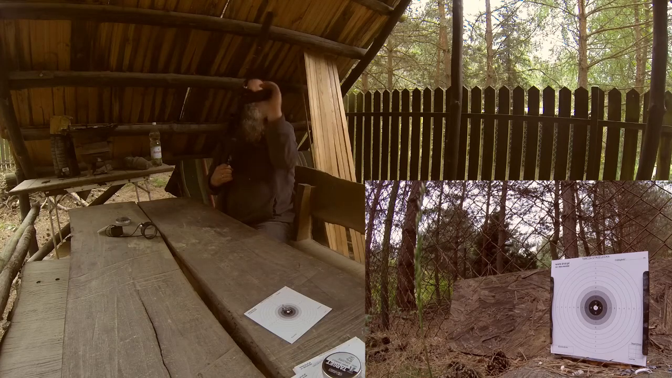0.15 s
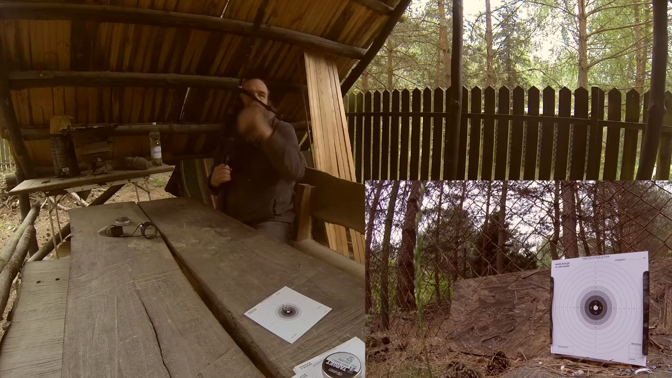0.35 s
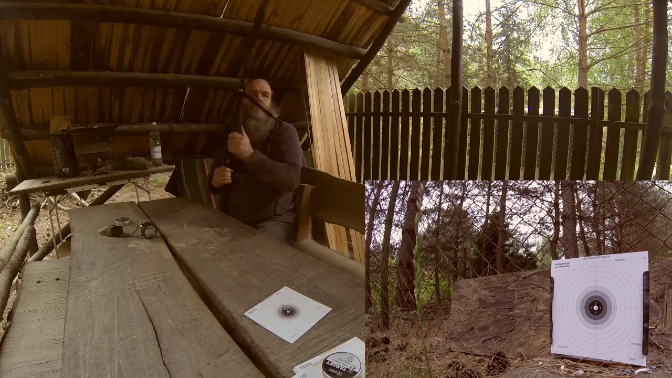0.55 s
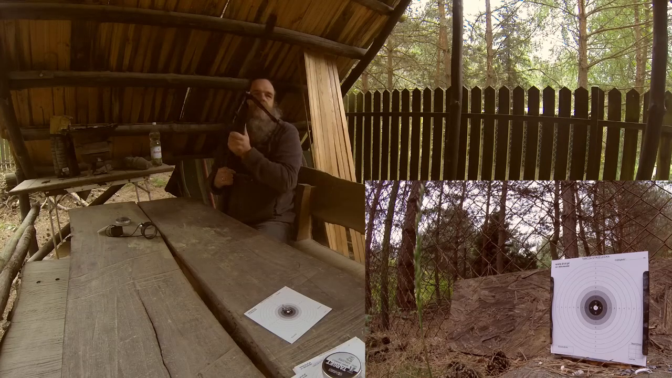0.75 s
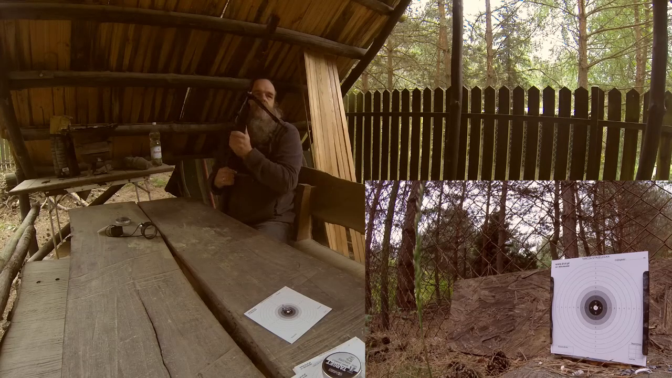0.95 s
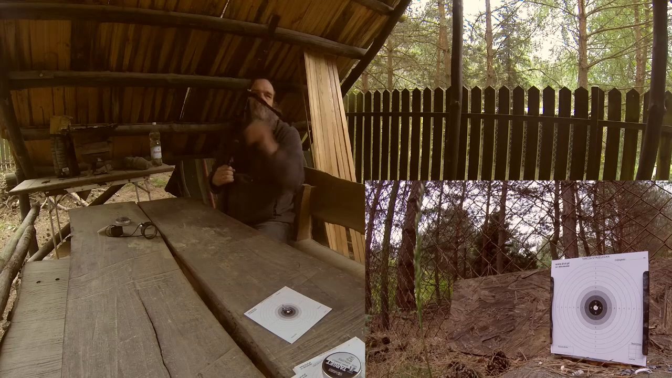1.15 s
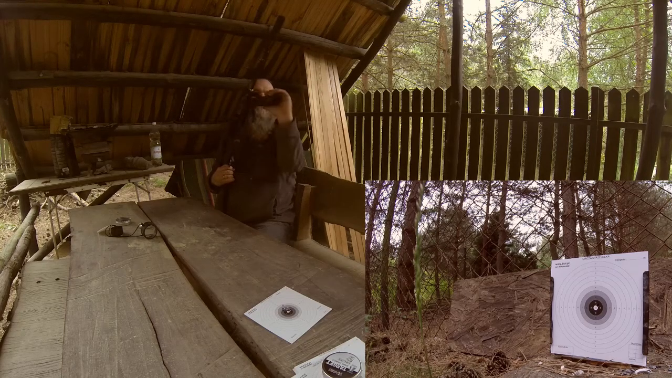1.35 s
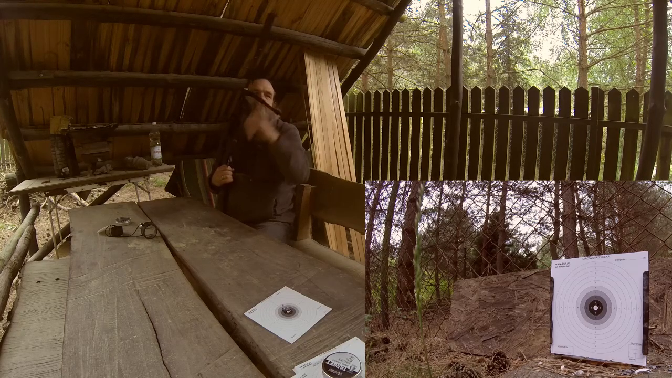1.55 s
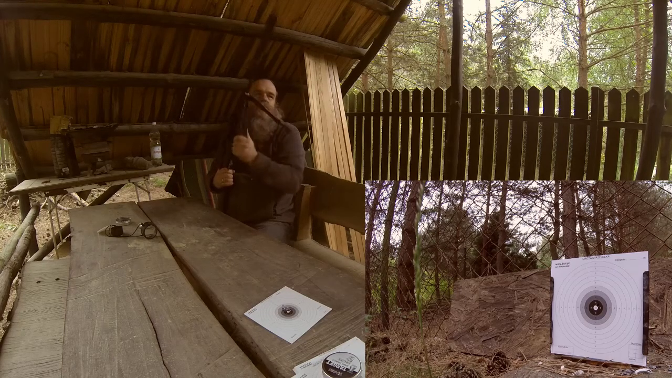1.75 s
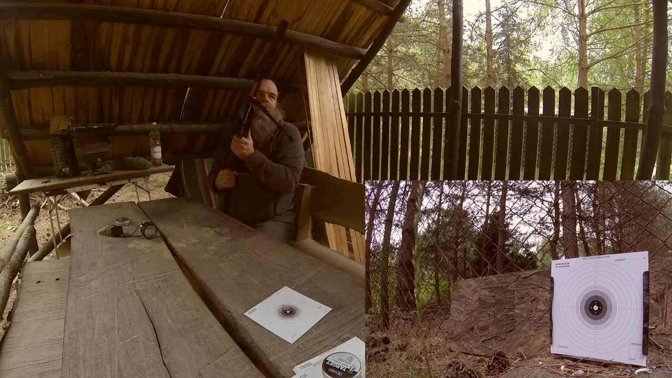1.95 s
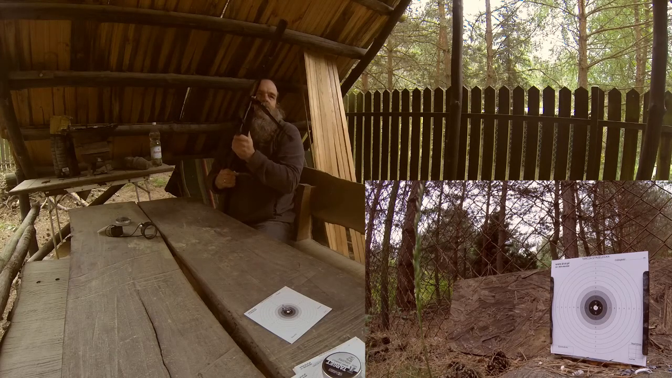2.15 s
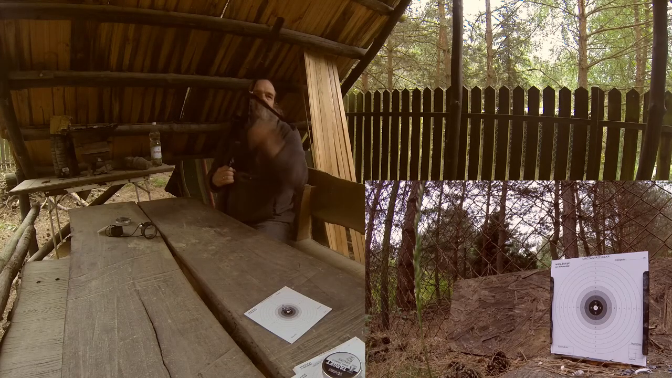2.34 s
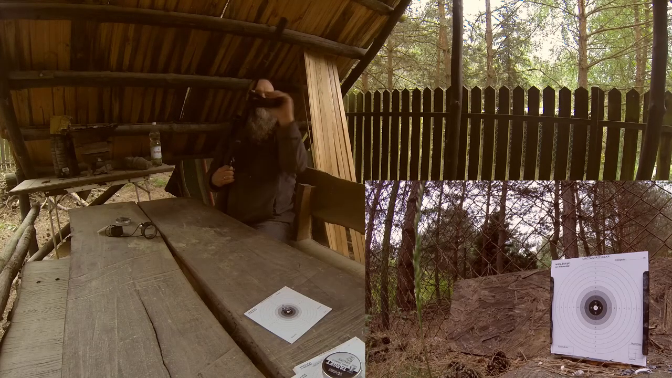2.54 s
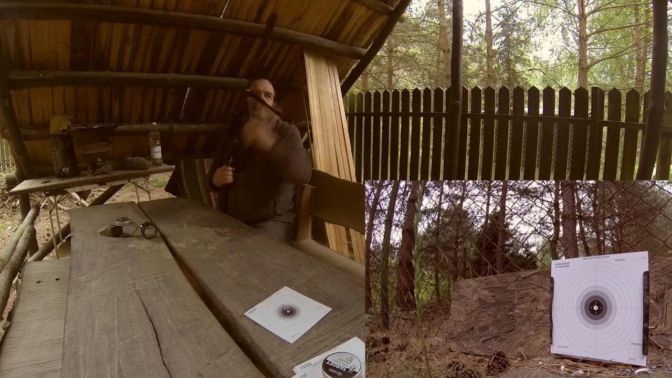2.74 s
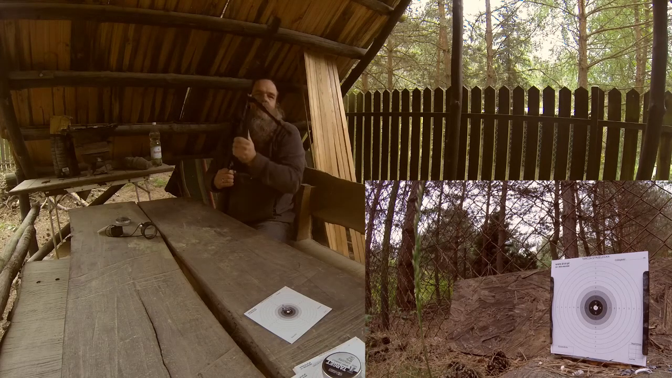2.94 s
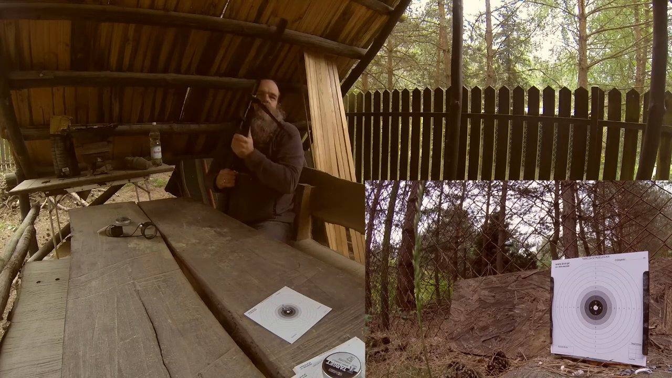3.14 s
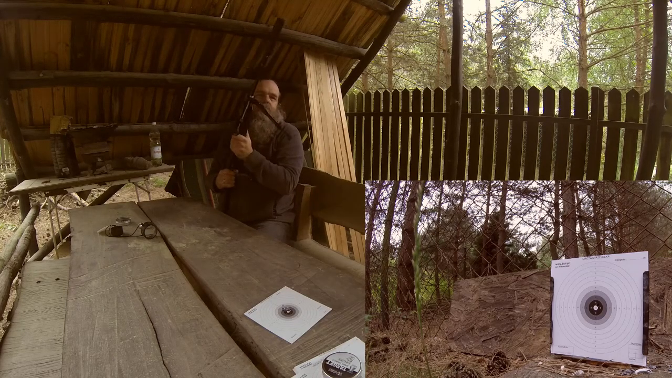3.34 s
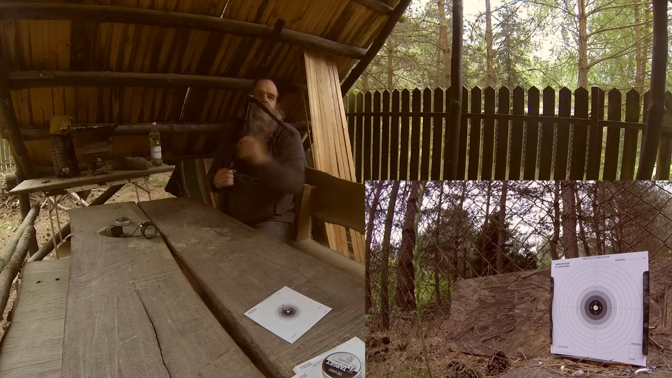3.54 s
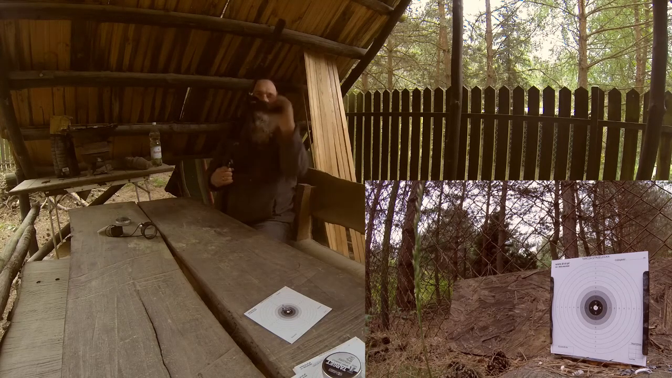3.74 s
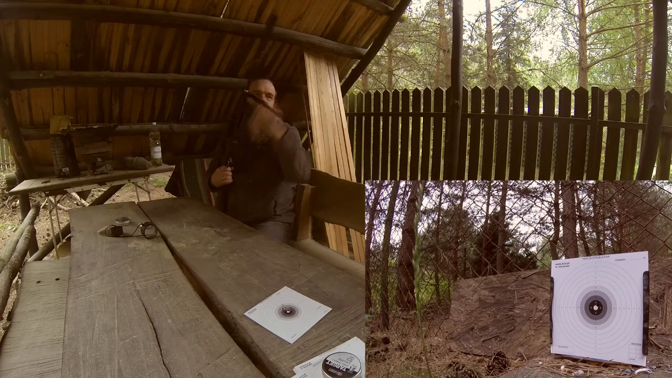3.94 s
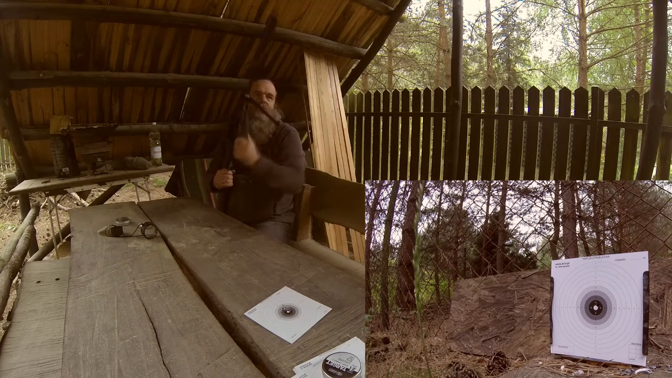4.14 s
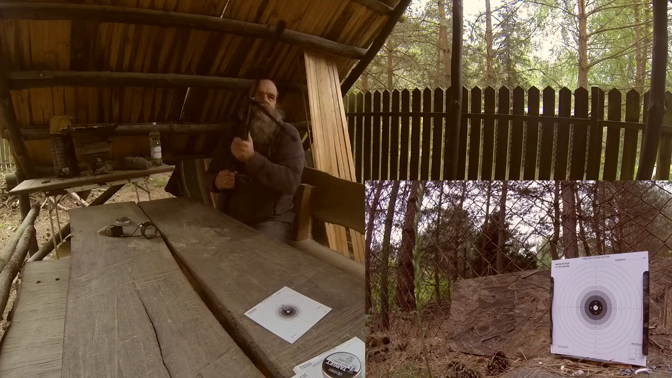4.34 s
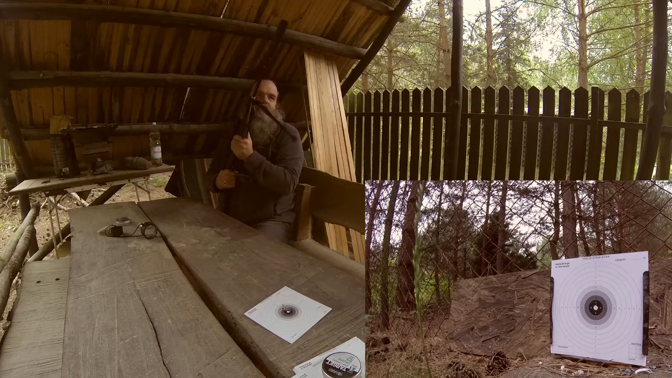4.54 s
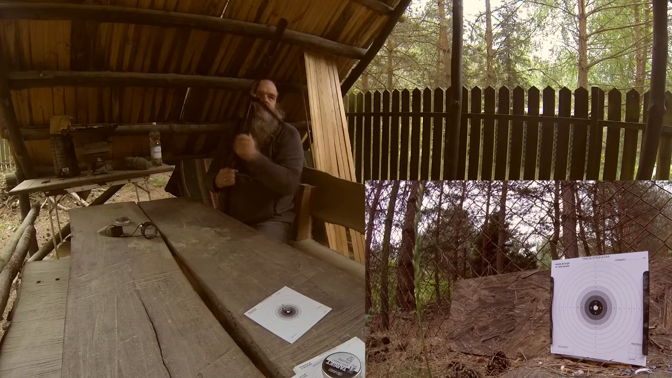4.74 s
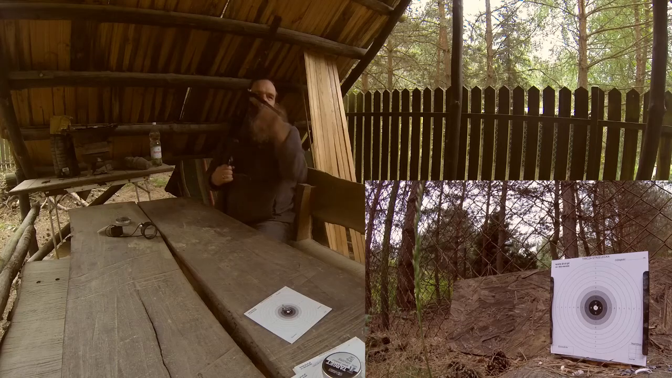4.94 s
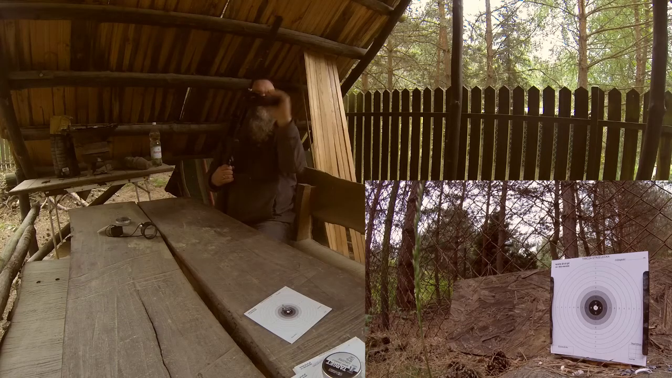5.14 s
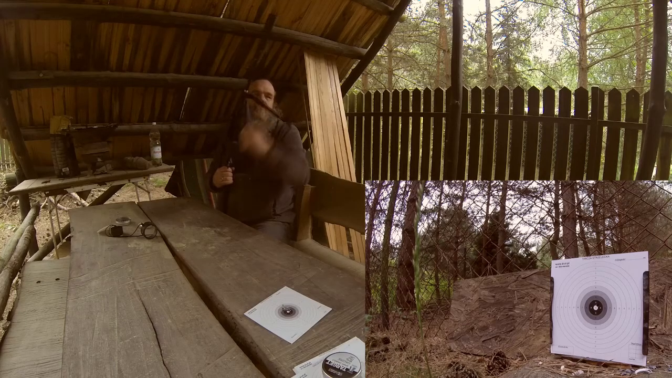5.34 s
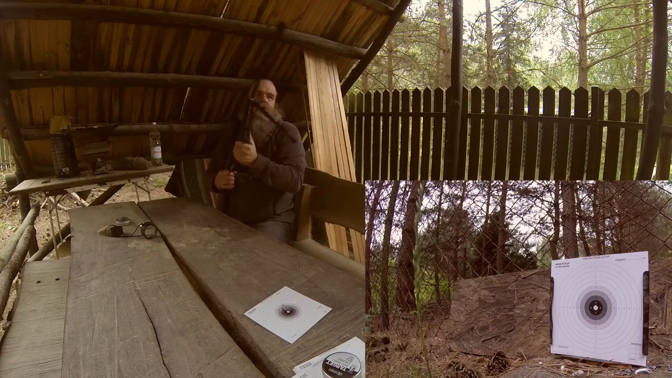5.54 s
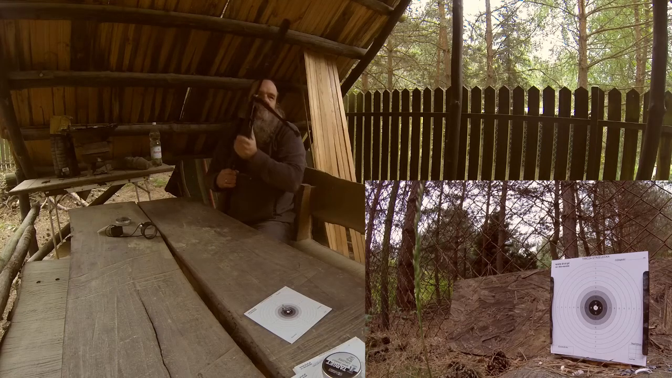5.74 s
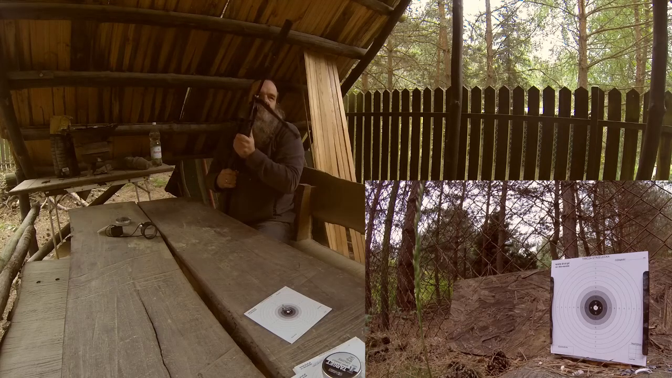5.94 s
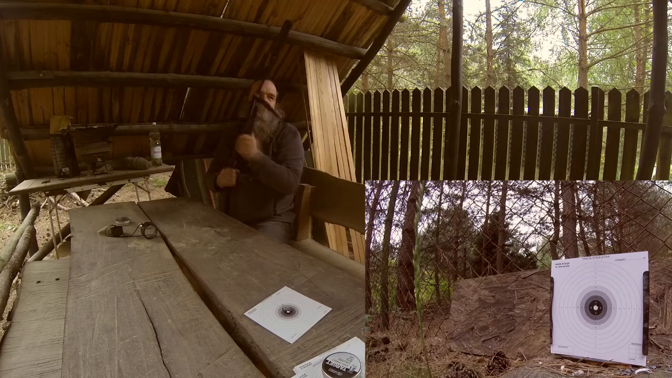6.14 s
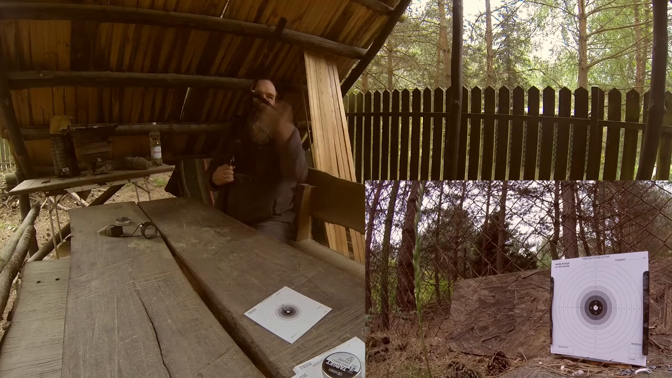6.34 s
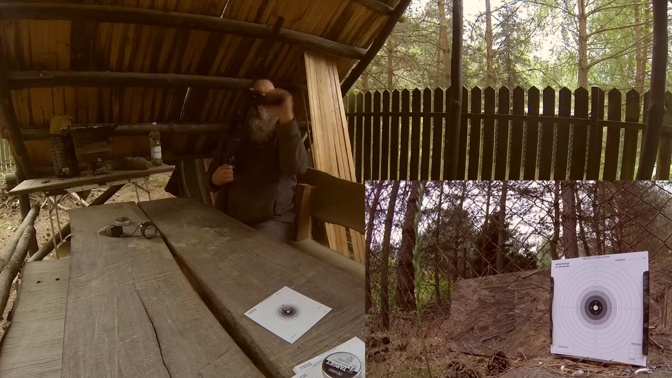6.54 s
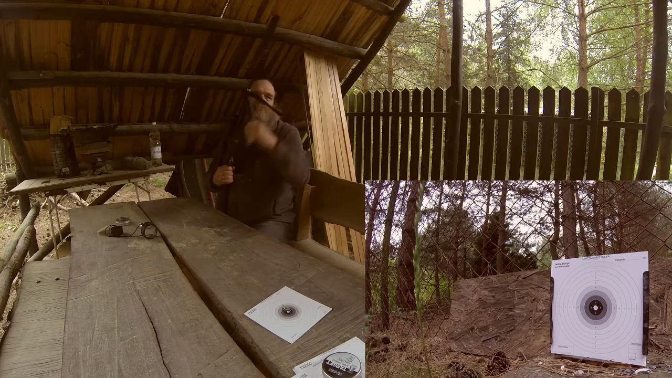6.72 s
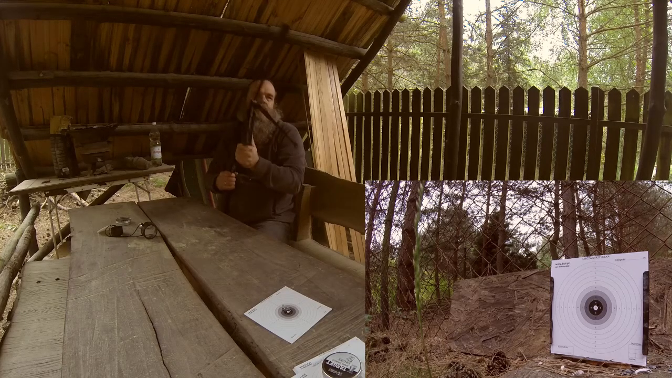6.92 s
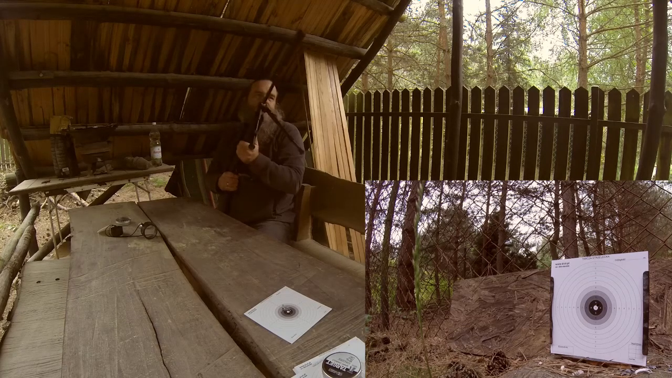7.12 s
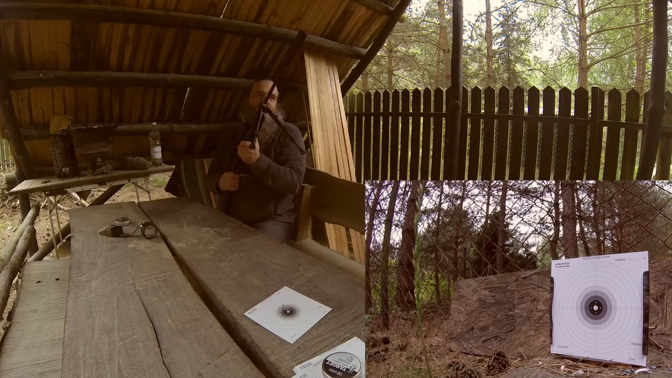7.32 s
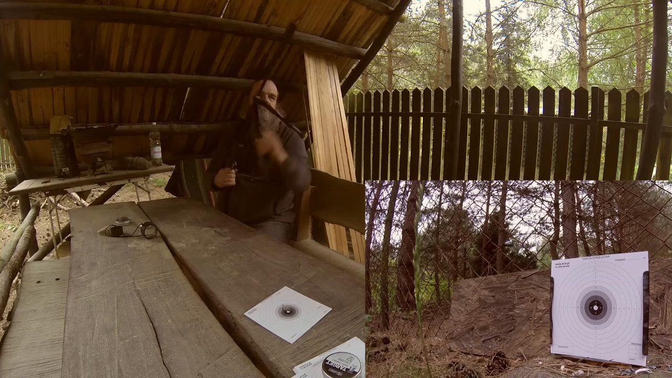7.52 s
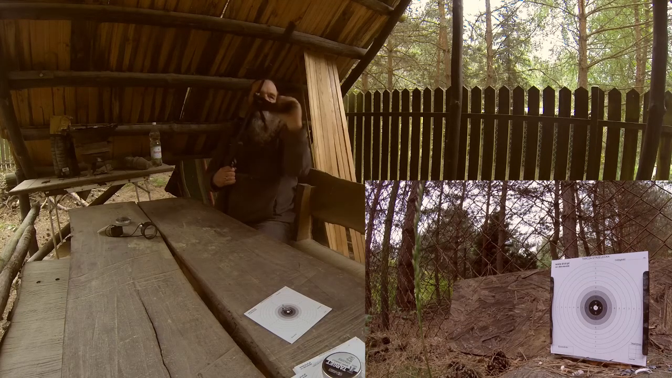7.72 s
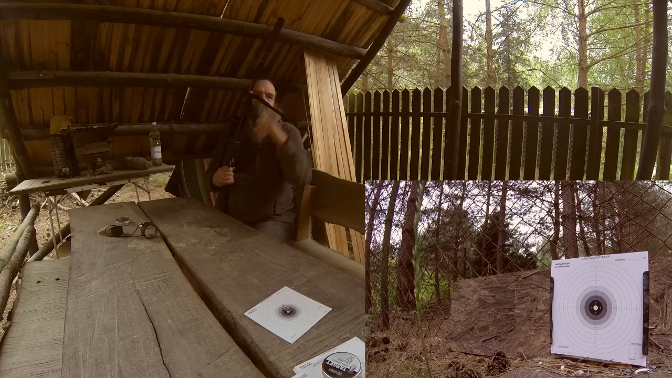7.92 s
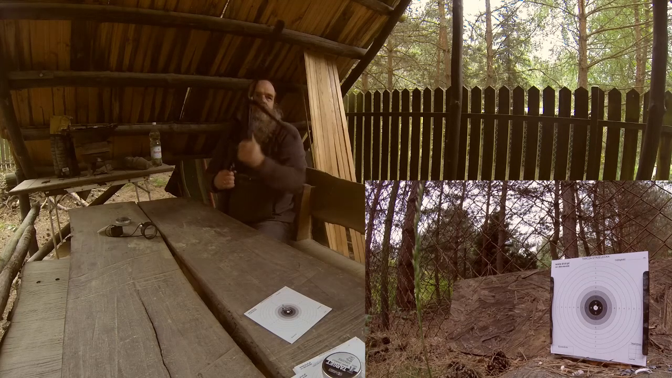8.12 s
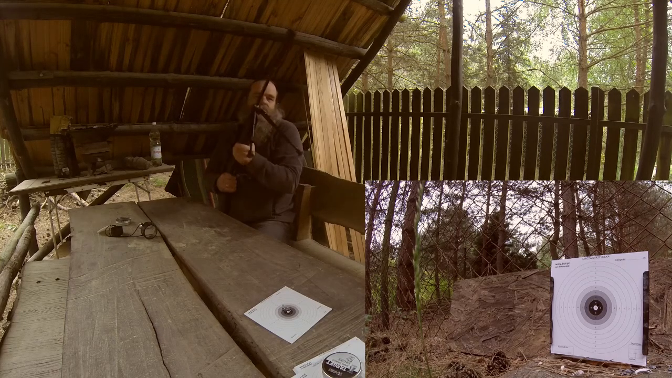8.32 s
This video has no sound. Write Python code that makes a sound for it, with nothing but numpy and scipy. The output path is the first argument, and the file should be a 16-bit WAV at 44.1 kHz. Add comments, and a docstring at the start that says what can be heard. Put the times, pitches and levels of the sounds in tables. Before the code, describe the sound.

The forearm of a pump air rifle slams shut close to the microphone seven times, at about 0.7, 1.9, 3.1, 4.4, 5.8, 7.1 and 8.3 seconds. Each is a sharp, short clack with a little metal chatter; they grow gradually louder and brighter, the last the strongest. Between them come much fainter dry clicks from the linkage: a snap as it opens about 0.4 seconds after each clack, a tick at the end of travel, and a latch click just before the next slam. One such tick comes right at the start. An open wooden shelter adds tight, quickly dying reflections. Underneath runs a very quiet woodland hiss with a low rumble. A barely audible distant engine hums, falling in pitch and fading out by 8 seconds. A small bird gives a few thin, faint, high chirps from 4.2 to 4.6 seconds.

```python
"""Sharp clacks, close by: the forearm of a pump air rifle slams shut, stroke after stroke.
Between slams its linkage clicks through release, opening, end stop, turn back and latch.
One microphone stands near the rifle, under the roof of an open wooden shelter in a wood.
Bench, roof and trees answer each blow; far off lie woodland hiss, an engine and one small bird."""
import sys
import numpy as np
from scipy import signal
from scipy.fft import rfft, irfft
from scipy.io import wavfile

SR = 44100
rng = np.random.default_rng(int(sys.argv[2]) if len(sys.argv) > 2 else 0)


def wrap_up_sound(samples):
    """Save the sound to the file named by the first command line argument, as 16-bit audio."""
    columns = np.atleast_2d(samples).T
    # keep every value between -1 and 1, then stretch to whole-number steps
    tamed = np.clip(columns, -1, 1)
    steps = np.round(tamed * 32767).astype(np.int16)
    wavfile.write(sys.argv[1], SR, steps)


N = 373791

# The forearm slamming shut, near the microphone: t/s, relative level/dB
SLAMS = [(.7399, -13.5), (1.908, -9.5), (3.107, -10), (4.395, -9), (5.806, -8), (7.0828, -7.5),
         (8.3193, -5)]
TREBLE_DB, TREBLE_PER_DB = 3.5, 1.39   # extra treble of a 0 dB slam; harder slams are brighter


def forearm_slams():
    """One hard inward blow, then a short metal chatter as the lever settles."""
    out, t = np.zeros(N), np.arange(18000) / SR
    for start, db in SLAMS:
        treble_db = TREBLE_DB + TREBLE_PER_DB * db
        chatter = from_db(-17) * rng.standard_normal(len(t)) * np.exp(-t / 0.0014)
        force = np.diff(chatter, prepend=0)   # chatter has no push behind it
        force[0] = -1   # the blow
        tilt = lambda hz: treble_db * np.clip(np.log2(hz / 1500), 0, 2) / 2
        ring = rifle_body(force, tilt, spread_db=1.8)
        crack = from_db(treble_db - 2.5) * band(force, 1740, 12600)   # modes too dense to tell apart
        add(out, from_db(db) * shelter(ring + crack), start - .0003)
    return out


# Modes of stock, tube and lever: f/Hz, relative level/dB, t60/s
RIFLE_MODES = [(219, -5.5, 0.04), (396.4, -14, 0.064), (541, -19, 0.024), (605, -8, 0.0075),
               (680, -28, 0.08), (736.7, -20.5, 0.13), (793, -12.5, 0.017), (1146, -21, 0.027),
               (1279, -31, 0.086), (1480, -6, 0.0052), (1840, -30, 0.012), (2140, -16, 0.0053),
               (2680, -4.5, 0.0016), (3980, -7, 0.0026), (4700, -54, 0.0067), (5610, -19, 0.0028),
               (6200, -31.5, 0.017)]


def rifle_body(force, colour_db, spread_db):
    """A contact force rings the rifle's modes; each blow shares its strength out differently."""
    out, chance = np.zeros(len(force)), rng.standard_normal(len(RIFLE_MODES))
    for k, (hz, db, t60) in enumerate(RIFLE_MODES):
        r, w = from_db(-60 / (t60 * SR)), 2 * np.pi * hz / SR
        gain = from_db(db + colour_db(hz) + spread_db * chance[k])
        out += signal.lfilter([0, gain * np.sin(w)], [1, -2 * r * np.cos(w), r * r], force + 1e-18)
    # so slim a body moves little air in the bass
    return signal.sosfilt(signal.butter(6, 360, "high", fs=SR, output="sos"), out)


# Light contacts of the linkage, heard close, one table a kind: t/s, relative level/dB
RELEASES = [(1.06, -45), (2.2263, -45.5), (3.496, -44), (4.7576, -42.5), (6.159, -42), (7.4481, -42.5)]   # the hand takes up the slack
OPENINGS = [(1.1344, -33.5), (2.286, -35), (3.5575, -35.5), (4.833, -29), (6.2359, -33), (7.5205, -34)]   # the forearm snaps free
STOPS = [(.0972, -37.5), (1.3261, -35), (2.4945, -35.5), (3.7578, -35), (5.0628, -39.5), (6.4373, -35),
         (7.7094, -41)]         # end of travel
SETTLES = [(3.838, -52.5), (5.1522, -51), (7.729, -46.5)]     # a faint tick just after some stops
TURNS = [(1.482, -49), (3.9505, -51), (6.604, -49), (7.8523, -48)]         # the forearm starts back
CATCHES = [(.697, -37.5), (1.875, -36), (3.076, -42), (4.368, -39.5), (5.781, -35), (7.056, -35),
           (8.300, -30.5)]     # the latch, just before each slam
# Each kind's colour: events, part/dB, broad/dB, tube/dB, bright/dB, lead-in/ms, decay/ms, part's f/Hz
CONTACTS = [(RELEASES, 3.2, 1.9, 2.7, -10, 1.2, 1.5, 2570), (OPENINGS, 2.1, 7, 1.1, 2, 4.0, 1.14, 1870),
            (STOPS, 2.1, 5.4, -2.7, 2.3, 1.497, 1.9, 3850), (SETTLES, 2.1, 5.5, -2.5, 2.5, 1.56, 2, 3900),
            (TURNS, 6, -1.5, -1.5, -7, 1.155, 2.2, 4200), (CATCHES, -1.5, -0.41, 10.8, -1.6, 3.1, 10, 3900)]


def linkage_clicks():
    """A dry rattle builds to one firm touch round the pitch of the part that is hit; the tube rings."""
    out, t_ms = np.zeros(N), np.arange(5000) / SR * 1000
    tube_colour = lambda hz: -45 * abs(np.log2(hz / 1230))
    for events, part_db, broad_db, tube_db, bright_db, lead_ms, decay_ms, part_hz in CONTACTS:
        touch_at = round(lead_ms / 1000 * SR)
        rise = np.minimum(t_ms / lead_ms, 1) ** 2
        swell = rise * np.exp(-np.maximum(t_ms - lead_ms, 0) / decay_ms)
        for start, db in events:
            touch = rng.choice([-1, 1]) * (np.arange(len(t_ms)) == touch_at)
            force = rng.standard_normal(len(t_ms)) * swell + from_db(14) * touch
            layers = [(part_db, band(force, part_hz / 1.67, part_hz * 1.29)),
                      (broad_db, band(force, 790, 5260)),
                      (tube_db, rifle_body(band(touch, 1060, 1440), tube_colour, spread_db=7.0)),
                      (bright_db, band(force, 4000, 13000))]
            click = sum(from_db(db + share_db) * unit_energy(layer) for share_db, layer in layers)
            add(out, shelter(click), start - touch_at / SR)
    return out


# Sharp reflections from the bench and the roof overhead: delay t/s, level/dB, low edge f/Hz
ECHOES = [(.0016, -6, 90), (.0065, -18.5, 920), (.0095, -8, 450), (0.016, -33, 990)]
# Scatter from shelter, wood, fence and trunks: start t/s, level/dB, t60/s, low f/Hz, high f/Hz
SCATTER = [(.005, -23.5, 0.072, 1300, 12200), (0.027, -44, 0.27, 824, 8600), (0.066, -49, 0.09, 600, 7310),
           (0.103, -46, 0.03, 6000, 11000)]


def shelter(sound):
    """Direct sound, single echoes, then dying scatter, new for each blow because the rifle moves."""
    t = np.arange(len(sound)) / SR
    direct = 1. * (t == 0)
    response = direct.copy()
    for delay, db, low_hz in ECHOES:
        response += from_db(db) * np.roll(band(direct, low_hz, 14600), round(delay * SR))
    for start, db, t60, low_hz, high_hz in SCATTER:
        rise = np.clip((t - start) / 0.0039 + 1, 0, 1)
        decay = from_db(db - 60 * np.maximum(t - start, 0) / t60)
        response += band(rng.standard_normal(len(t)) * rise * decay, low_hz, high_hz)
    return signal.fftconvolve(sound, response)


# Noise spectrum of the wood all round the shelter: f/Hz, relative level/dB
WOOD_SPECTRUM = [(12, -34), (20, 6.5), (44, 2), (96, -0.5), (255, -7), (1290, -16), (1400, -16),
                 (1760, -17.5), (3440, -22.5), (5850, -27.5), (12100, -37), (14300, -43), (16000, -69)]
HISS_DB = -65


def woodland():
    """Smooth far hiss of leaves and air over a lumpy bass rumble."""
    hz = np.maximum(np.fft.rfftfreq(N, 1 / SR), 1)
    knot_hz, knot_db = np.transpose(WOOD_SPECTRUM)
    spectrum = rfft(rng.standard_normal(N)) * from_db(np.interp(np.log(hz), np.log(knot_hz), knot_db))
    bass = 1 / (1 + (hz / 200) ** 4)
    hiss, rumble = irfft(spectrum * (1 - bass), N), irfft(spectrum * bass, N)
    gain = from_db(HISS_DB) / np.std(hiss)
    return gain * (hiss * from_db(0.41 * drift(7.8)) + rumble * from_db(0.86 * drift(4)))


# An engine a long way off: t/s, f/Hz, level/dB
ENGINE = [(0, 127, -83), (1.3, 113.3, -73), (2.0, 103.6, -69.5), (3.1, 92.3, -69), (4.5, 91.2, -69.5),
          (5.9, 93.3, -67.5), (6.5, 84, -71.5), (7.5, 79.8, -68)]


def far_engine():
    """One low tone, falling in pitch and wavering on the air."""
    t = np.arange(N) / SR
    times, pitches, levels = np.transpose(ENGINE)
    db = np.interp(t, times, levels) + drift(1)
    hz = np.interp(t, times, pitches) + 3 * drift(4.52)
    fade = np.clip(7.9 - t, 0, 1)
    return np.sqrt(2) * from_db(db) * fade * sine(hz)


# A small bird back among the trees: t/s, length/s, first f/Hz, last f/Hz, level/dB
CHIRPS = [(4.19, 0.027, 6300, 5460, -70), (4.287, 0.11, 7140, 6780, -60.5), (4.448, 0.029, 6500, 5600, -65),
          (4.464, 0.1, 7350, 6800, -65.5), (4.562, 0.054, 7300, 7000, -75)]


def bird():
    """Thin falling whistles, trilled fast enough to split into close lines, blurred by the trees."""
    out = np.zeros(N)
    for start, length, first_hz, last_hz, db in CHIRPS:
        t = np.arange(round(length * SR)) / SR
        glide_hz = first_hz + (last_hz - first_hz) * t / length
        wander = 1.5 * np.cumsum(rng.standard_normal(len(t))) / 40
        trill_hz = 500 * np.sin(2 * np.pi * 330 * t + wander)
        throb = 1 + .4 * np.sin(2 * np.pi * 45 * t)
        swell = np.sin(np.pi * (t / length) ** 0.68) ** .5
        add(out, from_db(db) * throb * swell * sine(glide_hz + trill_hz), start)
    blur = rng.standard_normal(3000) * np.exp(-np.arange(3000) / SR / 0.0086)
    return signal.fftconvolve(out, unit_energy(blur))[:N]


def from_db(db):
    """Decibels to gain."""
    return 10 ** (np.asarray(db) / 20)


def unit_energy(x):
    """Scale so that the squares sum to 1."""
    return x / np.sqrt(np.sum(x ** 2))


def sine(hz):
    """A tone that follows a pitch curve."""
    return np.sin(2 * np.pi * np.cumsum(hz) / SR)


def band(x, low_hz, high_hz):
    """Band-pass."""
    return signal.sosfilt(signal.butter(2, [low_hz, high_hz], "band", fs=SR, output="sos"), x)


def drift(rate_hz):
    """Slow random wander of unit rms, drawn every 40 samples."""
    r = np.exp(-2 * np.pi * rate_hz * 40 / SR)
    slow = signal.lfilter([1], [1, -2 * r, r * r], rng.standard_normal(N // 40 + 2002))[2000:]
    slow /= np.sqrt(np.mean(slow ** 2))
    return np.interp(np.arange(N) / 40, np.arange(len(slow)), slow)


def add(out, sound, start):
    """Mix a sound in at a start time in seconds."""
    at = round(start * SR)
    out[at:at + len(sound)] += sound[:N - at]


def scene():
    """The rifle close up and the wood behind it, in mono."""
    dulling = signal.butter(2, 12000, fs=SR, output="sos")   # the top rolls off above 12 kHz
    rifle = signal.sosfilt(dulling, forearm_slams() + linkage_clicks())
    return (rifle + woodland() + far_engine() + bird())[None]


def record(dry):
    """The microphone signal is cut steeply at the top, 60 dB down from 16.4 kHz."""
    return signal.sosfilt(signal.cheby2(12, 60, 16400, fs=SR, output="sos"), dry)


dry = scene()
out = record(dry)
wrap_up_sound(out)
```